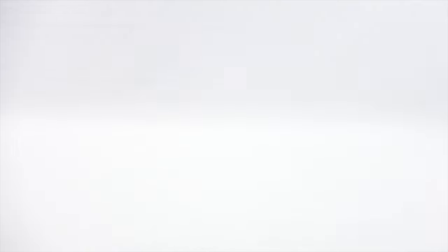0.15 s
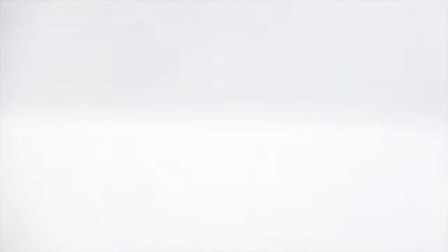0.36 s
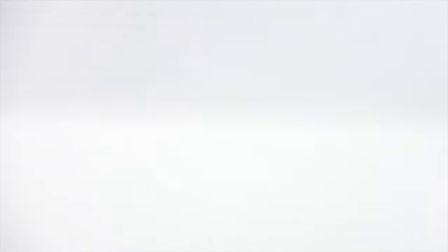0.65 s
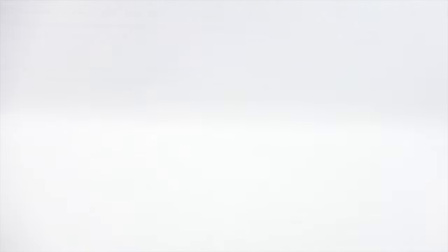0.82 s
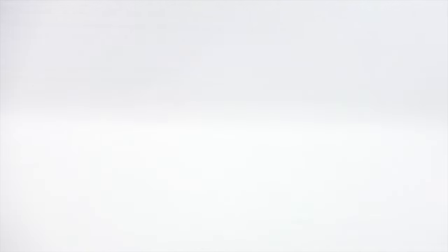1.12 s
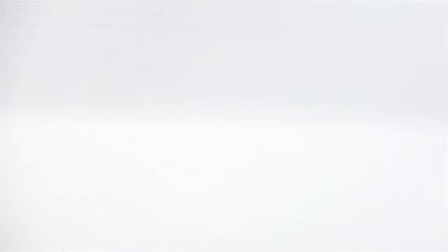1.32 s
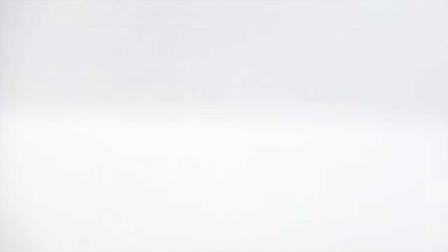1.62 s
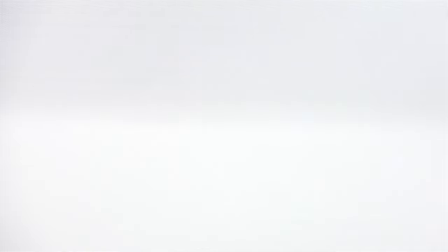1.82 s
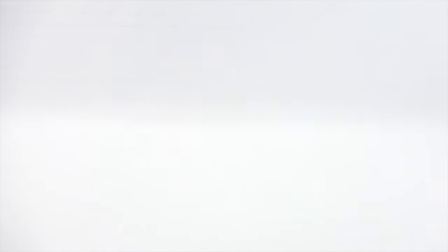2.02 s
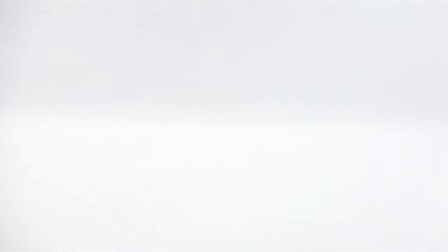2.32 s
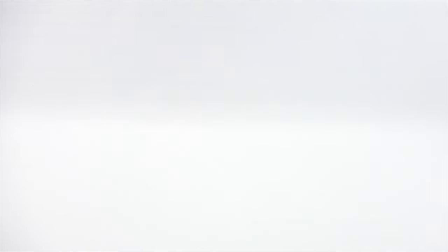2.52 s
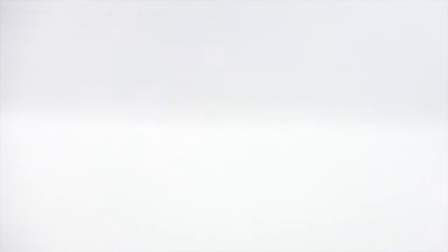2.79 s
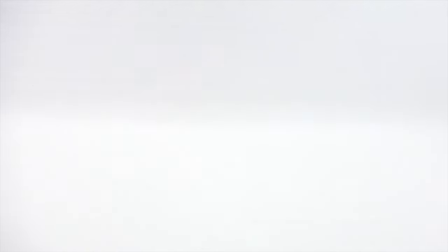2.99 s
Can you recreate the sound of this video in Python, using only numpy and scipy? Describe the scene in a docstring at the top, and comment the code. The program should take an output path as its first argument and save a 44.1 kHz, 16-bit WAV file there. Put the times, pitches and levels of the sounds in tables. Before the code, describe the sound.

A battery-powered toy bird's loose plastic gears rattle and tick without pause, close to the microphone in a small room, while thin film wings snap, puff and flutter about five times a second, slightly right.

```python
"""Loose plastic gears rattle in the shell of a battery toy bird, close by in a small room, a little to the right.
Random tooth contacts excite the shell's modes and tick; after wing strokes the train goes slack, then catches.
The linkage clacks, as decaying impulses of contact force.
About five times a second the thin wings snap taut (a filtered impulse) with a puff of air (a falling tone burst);
the film flutters and shudders as filtered noise."""
import sys
import numpy as np
from scipy import signal
from scipy.fft import rfft, irfft, next_fast_len
from scipy.io import wavfile
from scipy.ndimage import uniform_filter1d

SR = 44100
rng = np.random.default_rng(int(sys.argv[2]) if len(sys.argv) > 2 else 0)


def store_wav(level_fs):
    """Save 16-bit WAV to argv[1]."""
    pcm = np.round(np.clip(np.atleast_2d(level_fs), -1, 1) * 32767)
    wavfile.write(sys.argv[1], SR, pcm.T.astype(np.int16))


N = 138915
T = np.arange(N) / SR   # time in s


def from_db(db):
    """Logarithmic level: decibels to amplitude gain."""
    return 10 ** (np.asarray(db) / 20)


def rms_one(x):
    """Normalization: scale to unit mean power."""
    return x / np.sqrt(np.mean(x ** 2) + 1e-20)


def in_time(rows):
    """Linear interpolation: join (t/s, value) points by straight lines."""
    return np.interp(T, *np.transpose(rows))


def smooth(x, width_s):
    """Moving average: round off the edges of a curve."""
    return uniform_filter1d(x, max(int(width_s * SR), 1))


def clicks(times, sizes):
    """Impulse excitation: one single-sample impulse at each time."""
    at = np.round(times * SR).astype(int)
    inside = (at >= 0) & (at < N)
    return np.bincount(at[inside], sizes[inside], N)


def fade(x, decay_s):
    """Exponential relaxation: each impulse dies away with one time constant."""
    return signal.lfilter([1], [1, -np.exp(-1 / (decay_s * SR))], x + 1e-18)


def cut(x, hz, kind, order=2):
    """Spectral limitation: Butterworth high- or low-pass."""
    return signal.sosfilt(signal.butter(order, min(hz, SR / 2 - 1), kind, fs=SR, output="sos"), x)


def resonate(x, hz, width_hz):
    """Damped resonance: a two-pole filter with about unit gain at its peak."""
    r = np.exp(-np.pi * width_hz / SR)
    zeros = np.array([1, 0, -1]) * (1 - r * r) / 2
    poles = [1, -2 * r * np.cos(2 * np.pi * hz / SR), r * r]
    return signal.lfilter(zeros, poles, x + 1e-18)


def colour(x, points, power=1):
    """Spectral shaping: weight a sound by (f/Hz, level/dB) points, the levels multiplied by power."""
    hz, db = np.transpose(points)
    size = next_fast_len(N + SR // 2)
    bins = np.maximum(np.arange(size // 2 + 1) * SR / size, 1)
    gain = from_db(power * np.interp(np.log(bins), np.log(hz), db))
    return irfft(rfft(x, size) * gain, size)[..., :N]


def swell(centre_s, width_s):
    """Gaussian envelope: a bell-shaped rise and fall."""
    return np.exp(-((T - centre_s) / width_s) ** 2 / 2)


# wing strokes, levels relative: t/s, snap level/dB, puff level/dB, puff f/Hz, following flutter level/dB
FLAPS = [(.069,-43,-45,178,-52), (.257,-32,-32,111,-39.5), (0.45,-38,-36,93,-47.5), (.634,-30,-33,110,-43),
         (0.822,-41,-66,110,-35.5), (1.006,-32,-34,88.5,-37), (1.2,-33,-53,106,-37.5),
         (1.382,-25.5,-28,88,-41), (1.572,-35,-48,121,-38), (1.7505,-32,-50,133,-35.5),
         (1.943,-38,-43,114,-42.5), (2.136,-27,-32,127,-37), (2.3209,-26.5,-27.5,120,-40),
         (2.511,-31,-40,118,-38), (2.694,-29,-31.5,120,-38.5), (2.882,-27.5,-38,123,-37),
         (3.0696,-21,-23.5,135,-40)]


def each_beat(delay_s, width_s):
    """Periodic modulation: a swell at the same point of every wing beat."""
    return sum(swell(at + delay_s, width_s) for at, *_ in FLAPS)


# slack in the gear train: t/s of the catch, length/s, loss level/dB (negative is a gain)
SLACKS = [(0.156,0.065,5), (0.224,0.012,3), (0.303,0.026,4), (0.498,.018,11), (0.591,0.019,6),
          (0.667,0.02,12.5), (0.867,0.022,1), (1.035,0.035,4), (1.066,0.015,6.5), (1.448,0.012,-1.5),
          (1.784,0.021,8.5), (2.186,0.025,6), (2.72,0.015,5), (2.927,0.016,8), (3.137,0.012,7)]
# strength of the motor-driven rattle: t/s, level/dB
DRIVE = [(0, -0.5), (.35, -.5), (.9, 0), (1.6, 0.87), (2.4, 1), (3.15, 0.83)]
# knocks of the linkage, relative: t/s, level/dB
CLACKS = [(0.4258,-7.5), (0.4948,-10), (0.6056,-8), (0.6432,-10.5), (0.6808,-19), (0.8761,-5),
          (0.8842,-5.5), (1.057,-6.5), (1.3409,-9), (1.45,-4), (1.5418,-12.5), (1.6271,-13), (1.7177,-6.5),
          (1.7636,-6.5), (1.7918,-9), (1.9245,-3), (1.9628,-4), (1.9977,-10), (2.029,-5.5), (2.119,-5),
          (2.1956,-5.5), (2.2917,-5), (2.7226,-6), (2.822,-8), (2.9329,-3.5), (2.943,-2), (2.972,-3.5),
          (3.0307,-5), (3.12,-3)]
# the gears coast while the wings turn round
COAST_LEAD_S, COAST_END_S, COAST_EDGE_S, COAST_LOSS_DB = 0.012, 0.051, 0.018, 3
SLACK_EDGE_S = .002
EASE_DELAY_S, EASE_WIDTH_S, EASE_LOSS_DB = .127, .005, 1.5   # the load eases briefly in mid stroke
REBOUND_DELAY_S, REBOUND_WIDTH_S, REBOUND_DB = 0.01, 0.0058, 3.5   # the linkage rebounds after each snap
# teeth skip in short bursts over a steady whir
BURST_MEDIAN_GAP_S, BURST_JITTER, BURST_DECAY_S, BURST_SPREAD_DB, WHIR_SHARE = 1 / 150, .33, 0.0035, 5, 1
CATCH_DB, CATCH_DECAY_S = -7, .004   # the jolt grows with the depth of the slack
CLACK_DB, CLACK_DECAY_S, CLACK_LEAD_S = 16.5, 0.0015, 0.00095


def gear_load():
    """Load modulation: the gain sags at each turn of the wings and in slacks, and rises at each rebound."""
    coasting = sum(1.0 * ((T > at - COAST_LEAD_S) & (T < at + COAST_END_S)) for at, *_ in FLAPS)
    coast_db = COAST_LOSS_DB * smooth(coasting, COAST_EDGE_S)
    slack_db = sum(loss * np.sqrt(np.clip((T - end) / length + 1, 0, 1)) * (T < end)
                   for end, length, loss in SLACKS)
    slack_db = smooth(slack_db, SLACK_EDGE_S)
    ease_db = EASE_LOSS_DB * each_beat(EASE_DELAY_S, EASE_WIDTH_S)
    rebound_db = REBOUND_DB * each_beat(REBOUND_DELAY_S, REBOUND_WIDTH_S)
    return from_db(in_time(DRIVE) - coast_db - slack_db - ease_db + rebound_db)


def gear_force():
    """Incoherent addition: the powers of loaded tooth bursts, catches and linkage clacks sum."""
    chance = rng.standard_normal(size=(1500, 2))
    times = np.cumsum(np.exp(BURST_JITTER * chance[:, 0])) * BURST_MEDIAN_GAP_S
    sizes = from_db(BURST_SPREAD_DB * np.minimum(chance[:, 1], 2))
    bursts = rms_one(fade(clicks(times, sizes), BURST_DECAY_S))
    clack_s, clack_db = np.transpose(CLACKS)
    clacks = fade(clicks(clack_s - CLACK_LEAD_S, from_db(clack_db + CLACK_DB)), CLACK_DECAY_S)
    ends, _, loss_db = np.transpose(SLACKS)
    catches = fade(clicks(ends, from_db(loss_db + CATCH_DB)), CATCH_DECAY_S)
    power = (gear_load() * rms_one(bursts + WHIR_SHARE)) ** 2 + catches ** 2 + clacks ** 2
    return np.sqrt(uniform_filter1d(power, size=40))


LEAST_CONTACTS_PER_S, CONTACT_SPREAD_DB = 3500, 3


def tooth_contacts(force):
    """Random point process: above unit force contacts grow denser, each smaller in proportion to its root."""
    crowding = np.maximum(force, 1)
    hits = (rng.random(N) < LEAST_CONTACTS_PER_S * crowding / SR) / np.sqrt(crowding)
    return hits * from_db(CONTACT_SPREAD_DB * np.clip(rng.standard_normal(N), -2, 2))


# the shell's colour shifts from start to end: f/Hz, change of level/dB
SHIFT = [(1100, 4), (1550, 2.5), (2100, 5), (2700, -3), (3600, -9.5), (4400, -8), (5500, 0.5), (7000, -1)]
WANDER_DB, WANDER_PER_S = 2.0, 36   # rms swing and low-pass limit


def sway(hz):
    """Variable modal coupling: the point of contact moves, so each mode swells by itself amid a steady shift."""
    chance = rms_one(cut(rng.standard_normal(N + SR), WANDER_PER_S, "low")[SR:])
    shift_db = np.interp(hz, *np.transpose(SHIFT)) * np.linspace(-.5, .5, N)
    return from_db(shift_db + WANDER_DB * chance)


FLEX_SHARE, FLEX_PER_S = .022, 12   # rms share of the mode's pitch; low-pass limit


def flexing_mode(x, hz, width_hz):
    """Time-varying resonance: the modal frequency wavers as the shell flexes."""
    flex = rms_one(cut(rng.standard_normal(N + SR), FLEX_PER_S, "low")[SR:])
    turn = np.exp(2j * np.pi * np.cumsum(hz * (1 + FLEX_SHARE * flex)) / SR)
    r = np.exp(-np.pi * width_hz / SR)
    # shift the mode down to 0 Hz, low-pass, shift back
    return np.real(turn * signal.lfilter([1 - r], [1, -r], x / turn + 1e-18))


# modes of the plastic shell, levels relative: f/Hz, bandwidth/Hz, level/dB
SHELL = [(1118, 110, -3.5), (1255, 70, -0.5), (1596, 340, -6), (1833, 260, -2.5), (2175, 220, 0),
         (2430, 180, -1.5), (2913, 283, -2), (3588, 237, -0.5), (3740, 250, -4.5), (4342, 290, 2),
         (5200, 390, -2), (5525, 210, 1), (6045, 182, 2.5), (6830, 200, -3.5)]
# level of the force on the low modes: t/s, level/dB
LOW_MODES = [(0,1.5), (.3,-1), (.5,-1), (1.15,1), (1.6,-1), (3.15,-1.5)]
# hollow knocks that stir only the low modes: t/s, level/dB
BUMPS = [(.531,6), (.878,8.5), (1.887,2), (3.039,-1)]
BUMP_WIDTH_S, LOW_MODES_HZ = 0.0036, 2600
SHELL_LOW_HZ, SHELL_TOP_HZ = 970, 6870
SHADE_FULL_HZ = 7000   # the closing wings' loss is in proportion to f, complete here


def shell_modes(force, contacts, shade_db):
    """Modal superposition: each contact strikes every mode of the hollow shell with a strength of its own."""
    bumps = sum(from_db(db) * swell(at, BUMP_WIDTH_S) for at, db in BUMPS)
    low_force = np.hypot(force * from_db(in_time(LOW_MODES)), bumps)
    shell = np.zeros(N)
    for hz, width_hz, db in SHELL:
        gain = from_db(db - shade_db * hz / SHADE_FULL_HZ) * sway(hz)
        mode_force = low_force if hz < LOW_MODES_HZ else force
        strikes = mode_force * contacts * rng.standard_normal(N)
        shell += gain * flexing_mode(strikes, hz, width_hz)
    shell = cut(shell, SHELL_LOW_HZ, "high", order=5)
    return rms_one(cut(shell, SHELL_TOP_HZ, "low", order=6))


# spectrum of bare contact noise: f/Hz, level/dB
TICKS = [(300, -18), (600, 4), (1200, 0.5), (5000, -17), (7500, 7.5), (8700, 4.5), (10200, 0), (12400, 5),
         (14000, 0), (16000, -3.5)]
# stereo width of the ticks: f/Hz, side level/dB
SPREAD = [(300, -21), (7000, -9), (8000, -5), (11000, -6.5), (11900, -11), (16000, -14)]
# overall level of the ticks, constant: t/s, level/dB
TICKS_LEVEL = [(0, 1), (1.2, 1), (3.15, 1)]
TICKS_FOLLOW = 1.24   # exponent of the force


def contact_ticks(force, contacts, shade_db):
    """Impact noise: each contact gates a brief burst of noise, spread over mid and side."""
    grit = np.sqrt(fade(contacts ** 2, decay_s=0.00057)) * force ** TICKS_FOLLOW
    mid, side = colour(grit * rng.standard_normal((2, N)), TICKS)
    stereo = rms_one(mid + colour(side, SPREAD) * [[1], [-1]])
    return stereo * from_db(in_time(TICKS_LEVEL) - shade_db)


SHELL_DB, TICKS_DB = -21.5, -35.5
SHADE_LOSS_DB, SHADE_WIDTH_S = 8.5, 0.0087   # the rattle dulls as the wings close


def gears():
    """Common excitation: the same tooth contacts ring the shell and tick."""
    force = gear_force()
    contacts = tooth_contacts(force)
    shade_db = SHADE_LOSS_DB * each_beat(0, SHADE_WIDTH_S)
    shell = shell_modes(force, contacts, shade_db)
    ticks = contact_ticks(force, contacts, shade_db)
    return from_db(SHELL_DB) * shell + from_db(TICKS_DB) * ticks


PUFF_GLIDE_S = 0.01   # a puff falls in pitch as the wing slows


def glide(t):
    """Frequency modulation: warped time runs ever slower through a puff, after standing still before it."""
    return PUFF_GLIDE_S * (1 - np.exp(np.minimum(-t / PUFF_GLIDE_S, 2)))


# spectrum of the wing air: f/Hz, level/dB
AIR = [(20, -10), (40, -2), (88, 2), (125, -1), (210, -4), (300, -13), (450, -21), (900, -32), (2000, -60)]
SNAP_LAG_S, SNAP_DB = 0.00294, 33.5   # the snap follows its puff
SNAP_HZ, SNAP_WIDTH_HZ, SNAP_TOP_HZ = 474, 890, 1300
PUFF_DB, PUFF_WIDTH_S = 7.5, 0.0044
FLUTTER_DELAY_S, FLUTTER_WIDTH_S = 0.12, 0.022   # the wings ripple on the return stroke
WAKE_DELAY_S, WAKE_WIDTH_S, WAKE_DB = 0.0053, 0.0071, -4.5   # air left swirling by a snap
STIR_DB = -49.5   # air that never settles


def wings():
    """Impulse response and air displacement: a dull snap and a puff end each stroke; noise ripples after."""
    s, snap_db, *_ = np.transpose(FLAPS)
    jerks = clicks(s + SNAP_LAG_S, from_db(snap_db + SNAP_DB))
    snaps = cut(resonate(jerks, SNAP_HZ, SNAP_WIDTH_HZ), SNAP_TOP_HZ, "low")
    puffs, ripple = np.zeros(N), np.zeros(N)
    for at, db, puff_db, hz, flutter_db in FLAPS:
        tone = np.cos(2 * np.pi * hz * glide(T - at))
        puffs += from_db(puff_db + PUFF_DB) * swell(at, PUFF_WIDTH_S) * tone
        ripple += from_db(flutter_db) * swell(at + FLUTTER_DELAY_S, FLUTTER_WIDTH_S)
        ripple += from_db(db + WAKE_DB) * swell(at + WAKE_DELAY_S, WAKE_WIDTH_S)
    air = rms_one(colour(rng.standard_normal(N), AIR))
    return (ripple + from_db(STIR_DB)) * air - snaps - puffs


SHUDDER_DB, SHUDDER_WIDTH_S, SHUDDER_HZ, SHUDDER_WIDTH_HZ = -9, 0.005, 227, 120


def shudder():
    """Membrane resonance: the wing film rumbles briefly around each snap as narrow-band noise."""
    film = resonate(rng.standard_normal(N), SHUDDER_HZ, SHUDDER_WIDTH_HZ)
    film = rms_one(cut(film, SNAP_TOP_HZ, "low"))
    return film * sum(from_db(db + SHUDDER_DB) * swell(at, SHUDDER_WIDTH_S) for at, db, *_ in FLAPS)


ROOM_T60_S, ROOM_DB = .09, -13


def room(x):
    """Diffuse reverberation: an exponentially decaying noise tail is added to the direct sound."""
    t = T[:SR // 2]
    tail = rng.standard_normal(len(t)) * from_db(-60 * t / ROOM_T60_S)
    tail = tail[None] / np.linalg.norm(tail)
    return x + from_db(ROOM_DB) * signal.fftconvolve(x, tail, axes=1)[:, :N]


# left minus right by pitch, before scaling by 1.3 in all: f/Hz, level/dB
PAN = [(30, -7), (90, 2.5), (140, -4), (230, -4.5), (400, -5), (700, -2.5), (1300, -3), (1600, -5),
       (2400, -6), (3300, -5.5), (8000, -6), (12000, -3.5), (16000, -3.5)]
# the toy drifts to the right, left minus right added to the above: t/s, level/dB
TURN = [(0, 4.5), (.6, 3), (1.35, 0.8), (2.2, 1), (3.15, -0.5)]


def scene():
    """Interaural level difference: reverberant rattle and direct wing air come mostly from the right."""
    left, right = room(gears()) + cut(wings() + shudder(), 25, "high")
    lean = from_db(in_time(TURN) / 2)
    return np.array([colour(left, PAN, power=0.7) * lean, colour(right, PAN, power=-0.6) / lean])


CUTOFF_HZ = 15850


def record(dry, limit_db=-14.5, window_s=0.00083, release_db_per_s=500):
    """Dynamic compression: a quick limiter holds down the loudest knocks; a low-pass cuts the top."""
    level_db = 10 * np.log10(smooth(np.max(dry ** 2, axis=0), window_s) + 1e-12)
    fall = release_db_per_s * T
    over_db = np.maximum.accumulate(np.maximum(level_db - limit_db, 0) + fall) - fall
    low_pass = signal.ellip(10, .05, 60, CUTOFF_HZ, fs=SR, output="sos")
    return signal.sosfilt(low_pass, dry * from_db(-over_db))


dry = scene()
out = record(dry)
store_wav(out)
```